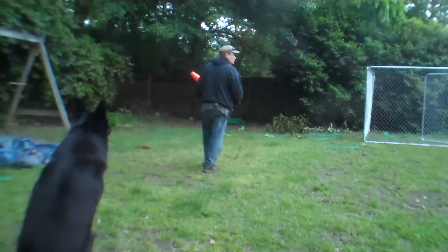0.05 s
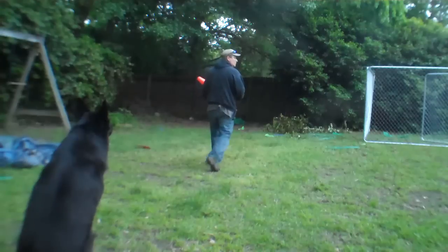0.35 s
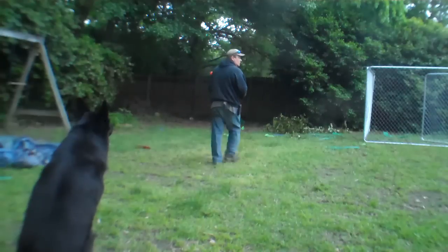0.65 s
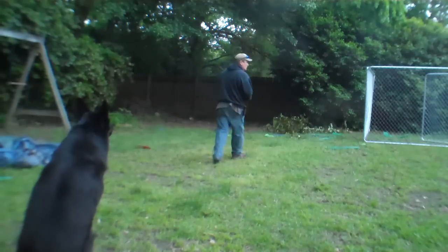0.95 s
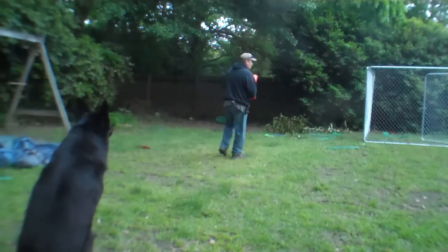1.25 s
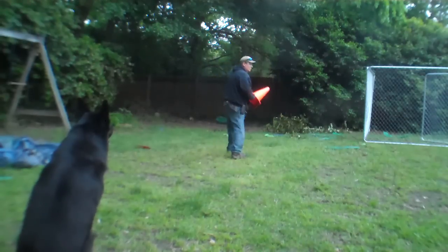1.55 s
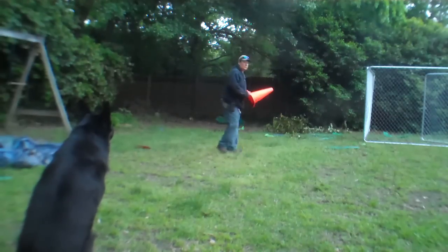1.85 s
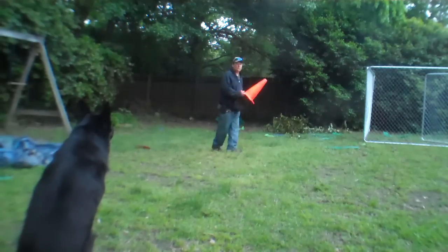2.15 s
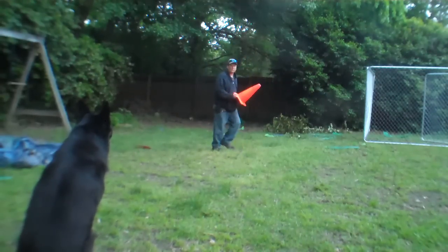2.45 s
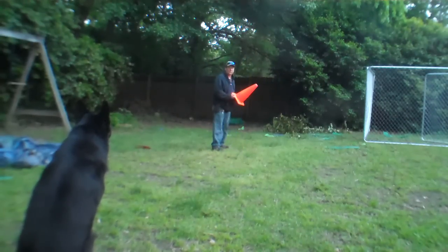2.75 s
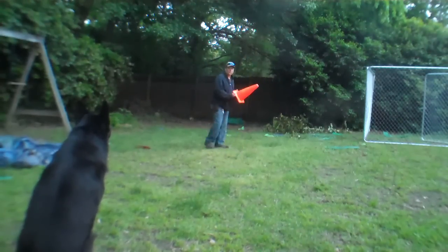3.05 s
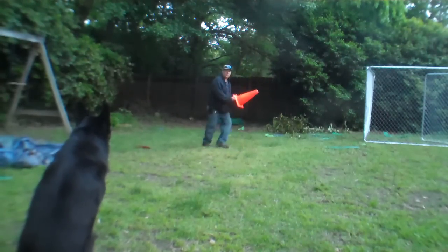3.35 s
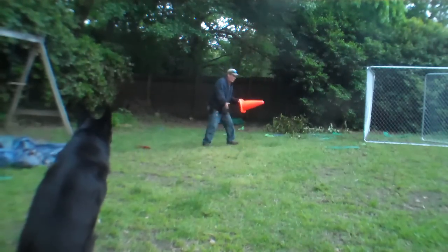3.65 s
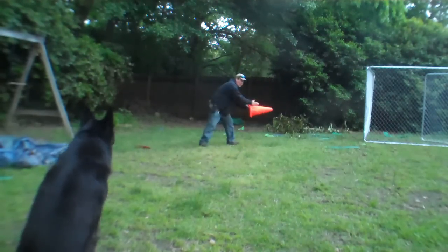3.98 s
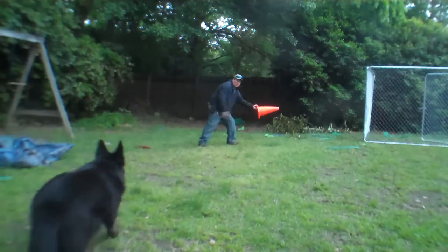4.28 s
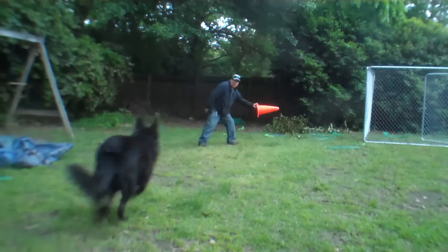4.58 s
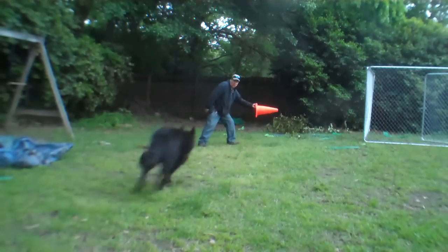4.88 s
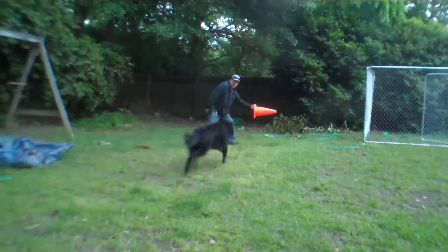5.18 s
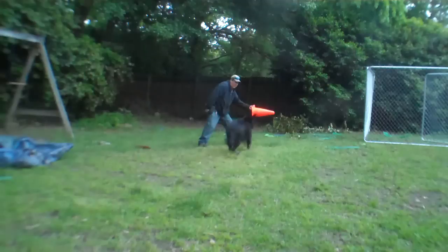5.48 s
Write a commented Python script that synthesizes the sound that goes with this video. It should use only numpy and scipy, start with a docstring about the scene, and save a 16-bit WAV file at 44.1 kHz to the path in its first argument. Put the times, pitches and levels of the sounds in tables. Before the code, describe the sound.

One loud, hollow slap on a plastic traffic cone breaks a quiet backyard's distant hum, followed by a dog's clicking claws and scuffing paws.

```python
"""Far traffic hums and small birds sing faintly over a quiet back lawn, where a man takes a few soft steps.
Then, far louder, he smacks the base of a plastic traffic cone: trapped air pops, the damped modes of the
cone ring briefly, and fence and trees throw the crack back. A dog close by springs off after it and runs
away over the grass, its claws clicking on impact and its paws scuffing through the blades."""
import sys
import numpy as np
from scipy import signal
from scipy.fft import rfft, irfft
from scipy.io import wavfile
from scipy.ndimage import uniform_filter1d, minimum_filter1d

SR = 44100
rng = np.random.default_rng(int(sys.argv[2]) if len(sys.argv) > 2 else 0)


def master(y):
    """Save y as 16-bit WAV."""
    cut = np.clip(np.atleast_2d(y).T, -1, 1)
    pcm = np.round(cut * 32767)  # scale
    wavfile.write(sys.argv[1], SR, pcm.astype(np.int16))


N = 243690

# Modes of the air in the cone, then of its wall. Each row: frequency in Hz, level in dB, t60 in seconds.
CONE_MODES = [(298, -19.9, .028), (321, -33, .1), (504, -13.7, .0065), (1170, -21.4, .015),
              (1481, -19.6, .014), (1834, -16.3, .011), (2100, -18.5, .016), (2769, -7.8, .0084),
              (3701, -13.1, .0127), (4625, -26.4, .024), (5089, -28.8, .024), (5463, -14.7, .0072),
              (5885, -21.1, .012), (6744, -10.9, .005)]
# Spectrum of the skin's crack. Each row: frequency in Hz, relative density in dB.
SKIN_SPECTRUM = [(300, -25), (800, -28), (1100, -7), (2200, -5.5), (3500, -12), (6000, -3), (8000, 0),
                 (9500, -7), (12000, -19), (16000, -43)]
def smack(contact_s=.00061, pop_hz=3100, pop_db=-1, crack_db=-24, crack_t60=.022):
    """Impact excitation: air squeezed from under the palm pops, then the damped plastic rings freely."""
    t = np.arange(SR // 5) / SR
    pulse = np.sin(np.pi * np.minimum(t / (2 * contact_s), 1)) ** 2
    pop = amp(pop_db) * pulse * np.sin(2 * np.pi * pop_hz * t)
    age = np.maximum(t - contact_s, 0)
    ring = sum(amp(db - 60 * age / t60) * np.sin(2 * np.pi * hz * age) for hz, db, t60 in CONE_MODES)
    ring = lowpass(ring, 8000, order=4)  # a soft palm barely drives the treble
    hiss = diffuse_noise(SKIN_SPECTRUM, len(t))
    crack = hiss * np.minimum(t / contact_s, 1) * amp(crack_db - 60 * age / crack_t60)
    mouth = signal.butter(2, 300, "high", fs=SR, output="sos")  # a small opening radiates little bass
    return signal.sosfilt(mouth, ring - pop + crack)


def ground_reflection(pair, delay_s=.00057, db=-2.9, cutoff_hz=4500):
    """Interference: the bounce off the lawn hollows the sound near 800 Hz and sharpens it near 3 kHz."""
    t = np.arange(pair.shape[1]) / SR
    bounce = [np.interp(t - delay_s, t, channel, left=0) for channel in lowpass(pair, cutoff_hz)]
    return pair + amp(db) * np.array(bounce)


# Reflections from around the lawn. Each row: delay in seconds, gain in dB, cutoff in Hz.
ECHOES = [(.019, -28, 9000), (.0395, -18.5, 500), (.048, -19, 1900), (.074, -21.5, 400), (.093, -25, 400),
          (.111, -28, 400)]
# The cone reaches the two microphone ports unequally. Each row: frequency in Hz, left minus right in dB.
CONE_BALANCE = [(400, 0), (1400, .8), (3100, .6), (5000, .5), (7000, .5), (8000, -6.5), (9200, -6),
                (10500, -2), (12000, 2)]
def cone(smack_s=4.047):
    """Multipath propagation: the smack arrives directly, as dulled echoes and as a scattered tail."""
    out = np.zeros((2, N))
    blow = ground_reflection(smack())
    add(out, smack_s, blow)
    for delay_s, db, cutoff_hz in ECHOES:
        add(out, smack_s + delay_s, amp(db) * lowpass(blow, cutoff_hz))
    out = balance(out, CONE_BALANCE)
    add(out, smack_s, scatter())
    return out


# Spectrum of the scattered sound. Each row: frequency in Hz, relative density in dB.
FOLIAGE_SPECTRUM = [(80, -28), (180, -12), (255, -7), (320, -0.5), (400, -14.5), (780, -15.5), (1000, -15),
                    (1900, -9), (2600, -8), (3150, -6.5), (4300, -10), (7000, -13.5), (9500, -22),
                    (11000, -32.5), (15000, -61)]
# Decay of the late echoes. Each row: frequency in Hz, t60 in seconds.
LATE_T60 = [(200, 0.91), (1300, 1.3), (3200, 0.88), (7000, 0.73), (13000, 0.86)]
def scatter(early_db=-31, early_t60=.26, build_s=.029, late_db=-39, clump_db=1, clump_hz=220):
    """Scattering: countless echoes from leaves and fence build up in clumps, fall fast, then linger."""
    t = np.arange(SR) / SR
    taps = rng.standard_normal((4, SR)) * amp(clump_db * wander(clump_hz))
    early = unit_rms(colour(diffuse(taps[:2]), FOLIAGE_SPECTRUM))
    early *= amp(early_db - 60 * np.maximum(t - build_s, 0) / early_t60)
    late = unit_rms(colour(diffuse(taps[2:]), FOLIAGE_SPECTRUM))
    hz, age, bands = signal.stft(late, SR, nperseg=256)
    bands = bands * amp(late_db - 60 * age / curve(LATE_T60, hz)[:, None])
    late = signal.istft(bands, SR, nperseg=256)[1][:, :SR]
    return (early + late) * np.minimum(t / build_s, 1)


# Spectra of snapping grass and crunching soil. Each row: frequency in Hz, relative density in dB.
GRASS_SPECTRUM = [(150, -15), (700, -13), (1500, -11.5), (2600, -4), (4200, 0), (6000, -3.5), (8000, -8),
                  (11000, -13.5), (14000, -22), (16000, -45)]
SOIL_SPECTRUM = [(60, -13), (200, -1), (450, -10), (700, -3), (1200, 3.5), (2200, -6.5), (4000, -5),
                 (12000, -62)]
# The man's footfalls. Each row: centre in seconds, level in dB, soil relative to grass in dB.
FOOTSTEPS = [(.105, -70, -8), (.783, -59.5, -5), (1.22, -65, 0), (1.79, -60, -5), (2.434, -59, 3.5),
             (3.068, -65, 1)]
# A shoe or paw dragged lightly. Each row: centre in seconds, level in dB, half length in seconds.
SWISHES = [(0.933, -59, .042), (4.473, -54.5, 0.072), (4.501, -48, 0.0068), (4.535, -56, 0.0032),
           (4.569, -44, 0.0094), (4.68, -49, 0.013), (4.9, -61.5, 0.3)]
# The gallop, fading with distance.
# Each row: centre in seconds, level in dB, half length in seconds, soil relative to grass in dB.
PAW_FALLS = [(4.761, -52.5, 0.0082, -14), (4.809, -56.5, 0.012, -9), (4.935, -59, .006, -4),
             (4.957, -56, .006, -3), (5.082, -64, 0.011, -4), (5.148, -62, .006, -5), (5.18, -67, .004, -3),
             (5.227, -64, 0.0037, -3), (5.286, -60.5, .004, -3)]
def scuffs(grain_db=4, grains_per_s=5500, far_cutoff_hz=8200, near_cutoff_hz=11000):
    """Shot noise: grass and grit snap in a dense crackle under each step, over a duller crunch of soil."""
    t, out = np.arange(N) / SR, np.zeros((2, N))
    grains = amp(grain_db * np.minimum(rng.exponential(1, (2, N)), 4)) * rng.choice([-1, 1], (2, N))
    snapping = rng.random((2, N)) < grains_per_s / SR
    grass = unit_rms(colour(diffuse(grains * snapping), GRASS_SPECTRUM))
    soil = diffuse_noise(SOIL_SPECTRUM, N)
    steps = [(s, db, .018, soil_db, far_cutoff_hz) for s, db, soil_db in FOOTSTEPS]
    swishes = [(s, db, half_s, -24, near_cutoff_hz) for s, db, half_s in SWISHES]
    paws = [(*paw, near_cutoff_hz) for paw in PAW_FALLS]
    for s, db, half_s, soil_db, cutoff_hz in steps + swishes + paws:
        span = abs(t - s) < 3 * half_s
        envelope = amp(db) * np.exp(-.5 * ((t[span] - s) / half_s) ** 2)
        out[:, span] += envelope * (lowpass(grass, cutoff_hz)[:, span] + amp(soil_db) * soil[:, span])
    return out


# Clicks of handling and of claws. Each row: start in seconds, level in dB, resonance in Hz,
# its boost in dB, knock relative to grit in dB, t60 in seconds, cutoff in Hz.
CLICKS = [(.088, -48, 4670, 17, -20, .016, 9000), (3.06, -40, 5240, 18, 0.5, .015, 7500),
          (3.083, -49.5, 3200, 15, -10, .014, 7000), (4.394, -27.5, 1670, 24, 0.5, 0.012, 9000),
          (4.4422, -29.5, 1950, 24, -14, 0.007, 6500), (4.556, -33, 3000, 15, -8, 0.015, 9000),
          (4.5604, -27.5, 3680, 4, -2, 0.013, 15000), (4.5724, -26, 3870, 16, -14, 0.015, 15000),
          (4.5745, -24, 5100, 13, -2, .012, 14000), (4.6834, -25, 4000, 3.5, -25, .01, 15000),
          (4.809, -47, 5500, 10, -20, .012, 14000), (4.8853, -42, 4530, 13, -20, .014, 12000),
          (5.274, -41.5, 4530, 10, -20, 0.0092, 12000), (5.333, -46, 4500, 5, -20, .01, 14000)]
def clicks(ring_spread=1.65, crest_db=5):
    """Damped resonance: a burst of grit rings broadly over a dull knock; soft contacts lose treble."""
    out, t = np.zeros((2, N)), np.arange(SR // 10) / SR
    for s, db, hz, ring_db, knock_db, t60, cutoff_hz in CLICKS:
        grit, knock = rng.standard_normal((2, len(t)))
        resonance = [(hz / ring_spread, 0), (hz, ring_db), (hz * ring_spread, 0)]
        grit = unit_rms(colour(colour(grit, GRASS_SPECTRUM), resonance))
        knock = amp(knock_db) * unit_rms(colour(knock, SOIL_SPECTRUM))
        envelope = amp(db - crest_db - 60 * t / t60)
        add(out, s, lowpass((grit + knock) * envelope, cutoff_hz))
    return out


# Heel and paws on the turf. Each row: start in seconds, level in dB, frequency in Hz, t60 in seconds.
THUDS = [(.778, -48.5, 587, 0.067), (2.436, -43.5, 1160, .03), (4.562, -43.5, 640, 0.06),
         (4.571, -44, 200, .08), (5.3, -49, 176, .12), (5.352, -48.5, 156, .12)]
def thuds(rise_s=.003):
    """Damped oscillation: a heel or paw that lands squarely gives a soft, low knock."""
    out, t = np.zeros((2, N)), np.arange(SR // 5) / SR
    for s, db, hz, t60 in THUDS:
        envelope = np.minimum(t / rise_s, 1) * amp(db - 60 * t / t60)
        add(out, s, envelope * np.sin(2 * np.pi * hz * t))
    return out


# One bird's clear whistles. Each row: start and length in seconds, first and final pitch in Hz,
# level in dB, settling in time constants per note (below 0 the slide speeds up).
WHISTLES = [(.385, .05, 1740, 2000, -60, 1), (0.624, .062, 3700, 2780, -60.5, 1.5),
            (0.705, .1, 2736, 2670, -63.5, 3.5), (0.851, 0.068, 3180, 3450, -59, 2.7),
            (.942, 0.066, 2490, 3140, -61, 2), (1.57, 0.094, 3170, 2870, -63.5, 3),
            (1.834, 0.15, 2696, 2790, -65, 4), (1.984, 0.047, 2756, 2800, -62.5, 3),
            (2.068, .062, 2560, 2870, -62, 2.7), (2.196, .027, 2590, 3660, -61, -2)]
# A second bird's falling chirps.
# Each row: start and length in seconds, first and final pitch in Hz, level in dB.
CHIRPS = [(1.929, .012, 7900, 6400, -64), (1.982, .014, 7900, 6400, -63), (2.304, 0.076, 5720, 3950, -63),
          (2.504, .026, 6900, 4050, -62), (2.614, .028, 6100, 4200, -66), (3.093, 0.016, 5700, 4200, -61)]
# Its buzzes, which settle on one pitch.
# Each row: start and length in seconds, first pitch in Hz, waver as a share of the pitch, level in dB.
BUZZES = [(1.343, .27, 3380, 0.022, -69), (2.36, .36, 4300, .08, -65.5)]
def birds(buzz_hz=4300, direct_db=-4.5, reverb_db=-4, trees_t60=.5):
    """Reverberation: thin whistles, chirps and buzzes are blurred by the impulse response of the trees."""
    song = np.zeros(N)
    for s, length, first_hz, final_hz, db, settle in WHISTLES:
        add(song, s, bird_note(length, first_hz, final_hz, db, waver=.0094, settle=settle))
    for s, length, first_hz, final_hz, db in CHIRPS:
        add(song, s, bird_note(length, first_hz, final_hz, db, waver=.009, settle=.6))
    for s, length, first_hz, waver, db in BUZZES:
        add(song, s, bird_note(length, first_hz, buzz_hz, db, waver, settle=2.7))
    trees = diffuse(rng.standard_normal((2, SR))) * amp(-60 * np.arange(SR) / SR / trees_t60)
    reverb = signal.fftconvolve(song[None], trees / np.linalg.norm(trees[0]), axes=1)[:, :N]
    return amp(direct_db) * song + amp(reverb_db) * reverb


def bird_note(length, first_hz, final_hz, db, waver, settle, waver_hz=126.4, flutter_db=2.5, flutter_hz=40):
    """Frequency and amplitude modulation: a tone wavers at random while it slides to its final pitch."""
    n = round(length * SR)
    progress = np.linspace(0, 1, n)
    hz = first_hz + (final_hz - first_hz) * np.expm1(-settle * progress) / np.expm1(-settle)
    hz *= 1 + waver * wander(waver_hz)[-n:]
    level = amp(db + flutter_db * wander(flutter_hz)[-n:])
    arch = np.sqrt(2 * abs(np.sin(np.pi * progress)))
    return level * arch * np.sin(2 * np.pi * np.cumsum(hz) / SR)


# Spectrum of the far traffic. Each row: frequency in Hz, relative density in dB.
TRAFFIC_SPECTRUM = [(12, -43), (20, -15), (22, -6.5), (38, -3), (89, -2), (270, -7.5), (484, -12),
                    (640, -10), (850, -6.5), (2160, -16.5), (2770, -16.5), (3270, -16.5), (4200, -16.5),
                    (8160, -27), (12000, -39.5), (15000, -71)]
# Its slow swells. Each row: time in seconds, then roar, rumble and drone in dB before band weighting.
TRAFFIC_SWELLS = [(0, 0.5, 3.5, -1), (1.05, 0.7, 1.5, 1), (1.8, 0.6, 0, 0.5), (2.8, 0.5, -2.5, 4),
                  (3.9, -1, -1.5, 2.5), (5.0, 3, 0, 4.5), (5.2, 3, -5, 5.5), (5.35, 3.5, -8, 7),
                  (5.53, 3, 4, 2)]
def traffic(level_db=-55.5, bass_patch_db=1.04, hiss_patch_db=1.32):
    """Modulated broadband noise: the far roar swells slowly and flickers in patches of time and pitch."""
    hz, t, bands = signal.stft(diffuse_noise(TRAFFIC_SPECTRUM, N), SR, nperseg=1024, noverlap=768)
    patches = uniform_filter1d(rng.standard_normal(bands.shape[1:]), size=8, axis=0)
    patches = unit_rms(uniform_filter1d(patches, size=14, axis=1))
    depth_db = curve([(200, bass_patch_db), (2000, hiss_patch_db)], hz)[:, None]
    gain_db = level_db + depth_db * patches
    s, roar_db, rumble_db, drone_db = np.transpose(TRAFFIC_SWELLS)
    roar = curve([(60, .37), (170, .6), (1300, 1), (4000, .78)], hz)
    rumble = curve([(90, .78), (150, .043)], hz)
    drone = curve([(100, 0), (160, 1), (230, .056), (340, 0)], hz)
    for weight, swell_db in (roar, roar_db), (rumble, rumble_db), (drone, drone_db):
        gain_db += np.outer(weight, np.interp(t, s, swell_db))
    return signal.istft(bands * amp(gain_db), SR, nperseg=1024, noverlap=768)[1][:, :N]


def whine(hz=7867, half_width_hz=35, db=-81):
    """Narrowband noise: a faint hiss inside the recorder, gathered around one frequency."""
    in_phase, quadrature = lowpass(rng.standard_normal((2, 2, N)), half_width_hz)
    carrier = np.exp(2j * np.pi * hz * np.arange(N) / SR)
    return amp(db) * unit_rms(((in_phase + 1j * quadrature) * carrier).real)


# Likeness of left and right. Each row: frequency in Hz, correlation from -1 to 1.
COHERENCE = [(60, 0.9), (130, 0.98), (290, 0.89), (640, 0.81), (1410, 0.54), (3100, -0.22), (6820, 0.071),
             (15000, -0.13)]
def diffuse(pair):
    """Diffuse-field coherence: sound from all around is alike at two close ports mainly in the bass."""
    a, b = rfft(pair)
    coherence = np.clip(curve(COHERENCE, np.fft.rfftfreq(pair.shape[1], 1 / SR)), -.9, .99)
    mid, side = a * np.sqrt(1 + coherence), b * np.sqrt(1 - coherence)
    return irfft([mid + side, mid - side], pair.shape[1])


def diffuse_noise(spectrum, n):
    """Spectral shaping: n samples of coloured noise from all around, at unit rms."""
    return unit_rms(colour(diffuse(rng.standard_normal((2, n))), spectrum))


def colour(x, spectrum):
    """Minimum-phase filtering: a causal response follows the (Hz, dB) points."""
    log_gain = np.log(amp(curve(spectrum, abs(np.fft.fftfreq(2048, 1 / SR)))))
    taps = np.fft.ifft(np.exp(np.conj(signal.hilbert(log_gain)))).real
    return signal.fftconvolve(np.atleast_2d(x), taps[None, :len(taps) // 2], axes=1)[:, :x.shape[-1]]


def balance(pair, points):
    """Level difference: (Hz, dB) points tilt left against right."""
    tilt_db = curve(points, np.fft.rfftfreq(N, 1 / SR)) / 2
    return irfft(rfft(pair) * amp([tilt_db, -tilt_db]), N)


def lowpass(x, hz, order=2):
    """Roll-off: treble falls 6 dB per octave for each order."""
    return signal.sosfilt(signal.butter(order, hz, fs=SR, output="sos"), x)


def wander(hz):
    """Random modulation: one second of low-passed noise at unit rms."""
    return unit_rms(lowpass(rng.standard_normal(SR), hz))


def curve(points, hz):
    """Interpolation of (Hz, value) points on a log-frequency axis."""
    f, value = np.transpose(points)
    return np.interp(np.log(hz + 1), np.log(f + 1), value)


def amp(db):
    """Decibels as an amplitude ratio."""
    return 10 ** (np.asarray(db) / 20)


def unit_rms(x):
    """Normalisation to unit power."""
    return x / np.sqrt(np.mean(x ** 2) + 1e-20)


def add(mix, s, sound):
    """Superposition: a sound joins the mix at s seconds."""
    part = mix[..., max(round(s * SR), 0):][..., :sound.shape[-1]]
    part += sound[..., :part.shape[-1]]


def scene():
    """Linear superposition: the pressures of all sources add."""
    return cone() + clicks() + scuffs() + thuds() + birds() + traffic() + whine()


def gain_control(x, threshold_db=-20, duck_share=.2, react_s=.008, hold_s=.622, recover_db_per_s=43):
    """Compression: after a loud peak the gain drops by a share of the excess, holds, then recovers."""
    peak_db = 20 * np.log10(abs(x).max(0) + 1e-9)
    cut_db = duck_share * np.maximum(peak_db - threshold_db, 0)
    hold, react = round(hold_s * SR), round(react_s * SR)
    held_db = -minimum_filter1d(-cut_db, hold, origin=(hold - 1) // 2, mode="constant")
    recovery_db = np.arange(N) / SR * recover_db_per_s
    duck_db = np.maximum.accumulate(held_db + recovery_db) - recovery_db
    delayed_db = np.pad(duck_db, (react, 0))[:N]
    return x * amp(-uniform_filter1d(delayed_db, react))


# The two microphone ports differ in colour. Each row: frequency in Hz, left minus right in dB.
PORT_BALANCE = [(60, -1.5), (150, -1.5), (380, -2), (950, -1.0), (2380, -0.5), (5980, -3), (15000, 1)]
def record(dry, knee=.6, ceiling=1.03, cutoff_hz=14800):
    """Soft saturation rounds the tip of the smack; then the gain ducks and the band is limited."""
    heard = balance(dry, PORT_BALANCE)
    linear, headroom = np.clip(heard, -knee, knee), ceiling - knee
    rounded = linear + headroom * np.tanh((heard - linear) / headroom)
    band_limit = signal.firwin(127, cutoff_hz, window=("kaiser", 9), fs=SR)
    return signal.oaconvolve(gain_control(rounded), band_limit[None], "same")


dry = scene()
out = record(dry)
master(out)
```